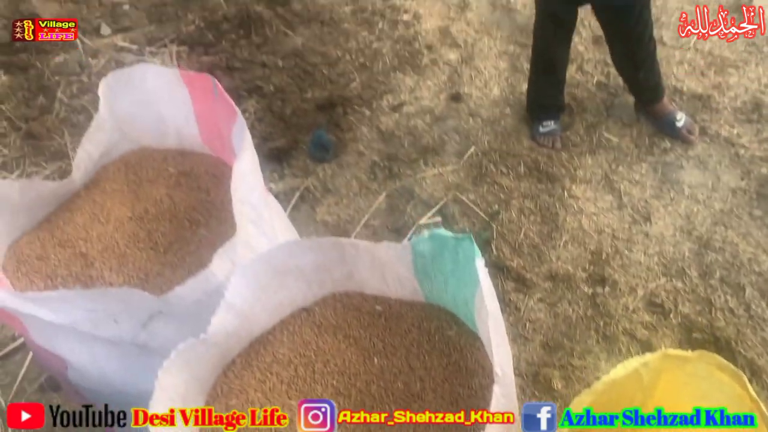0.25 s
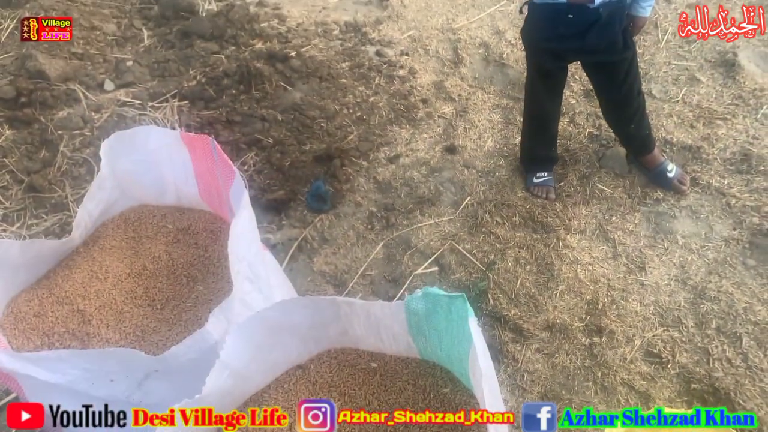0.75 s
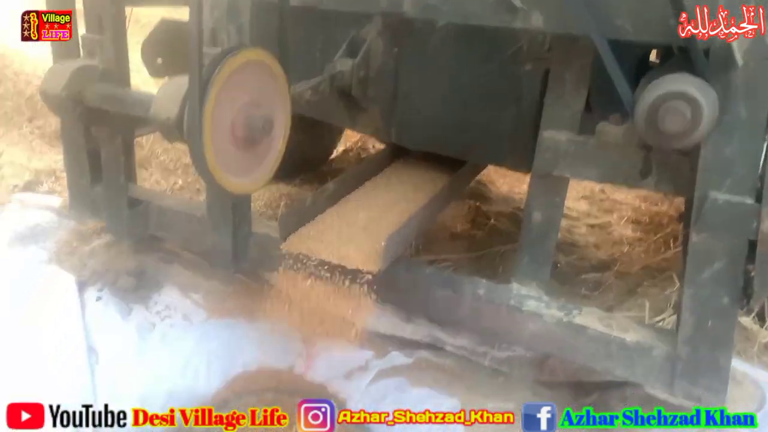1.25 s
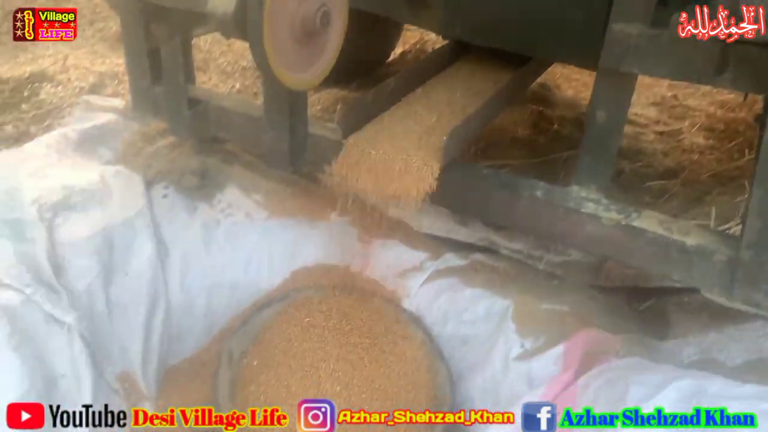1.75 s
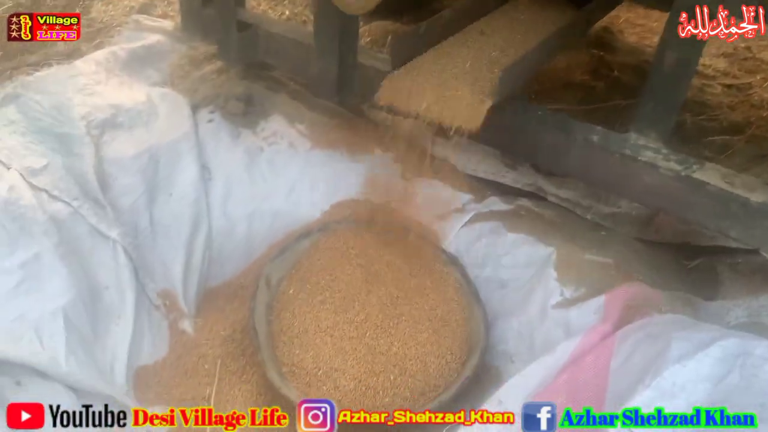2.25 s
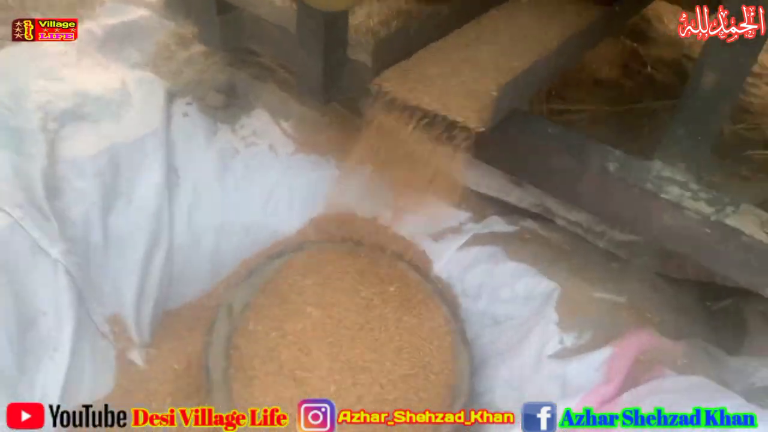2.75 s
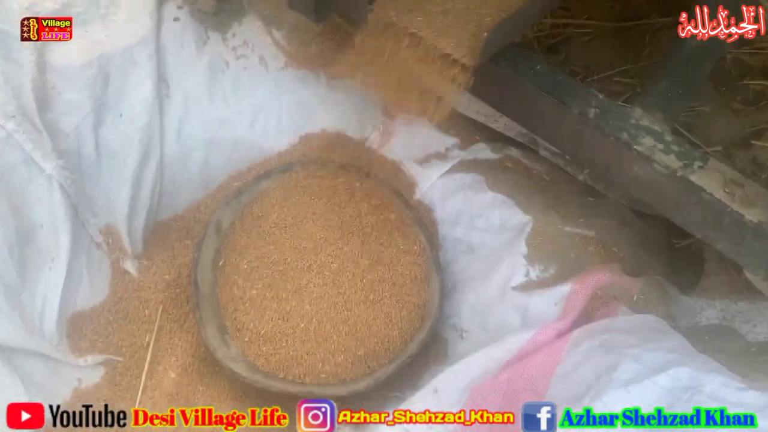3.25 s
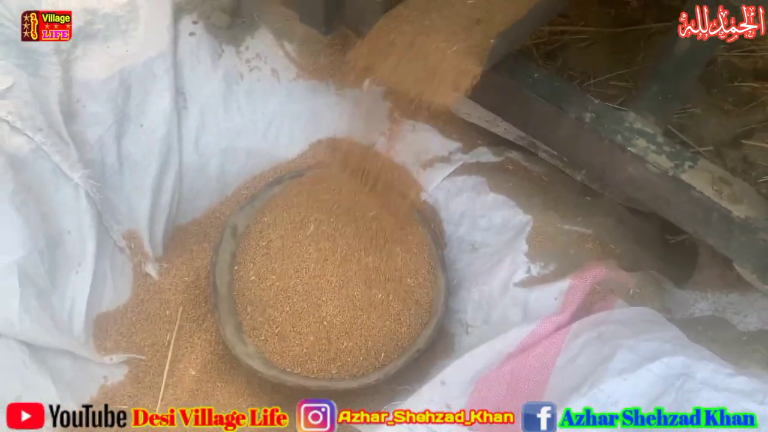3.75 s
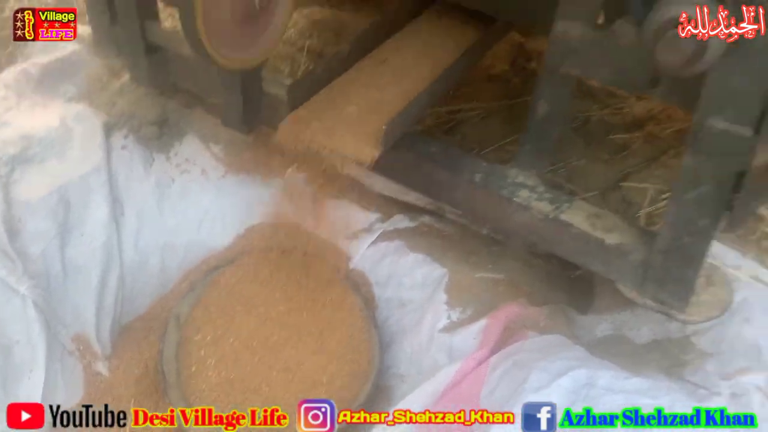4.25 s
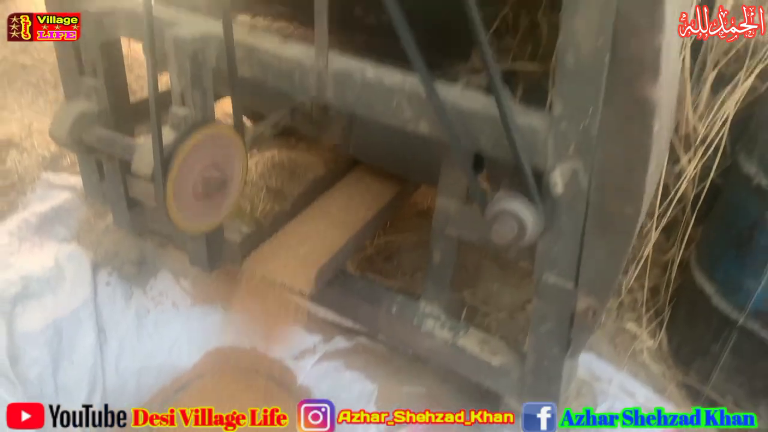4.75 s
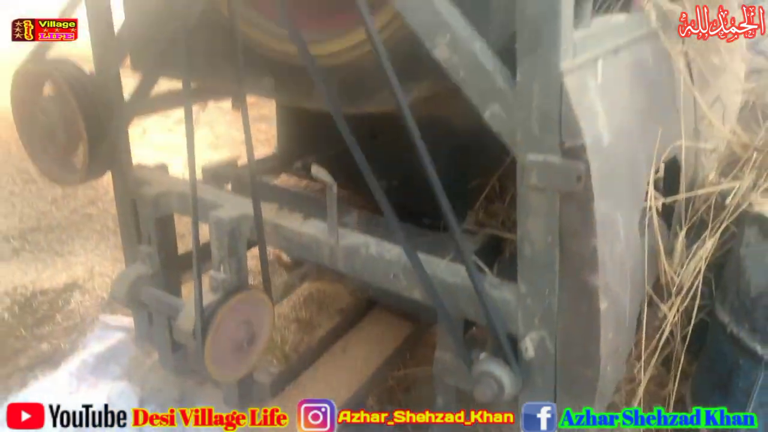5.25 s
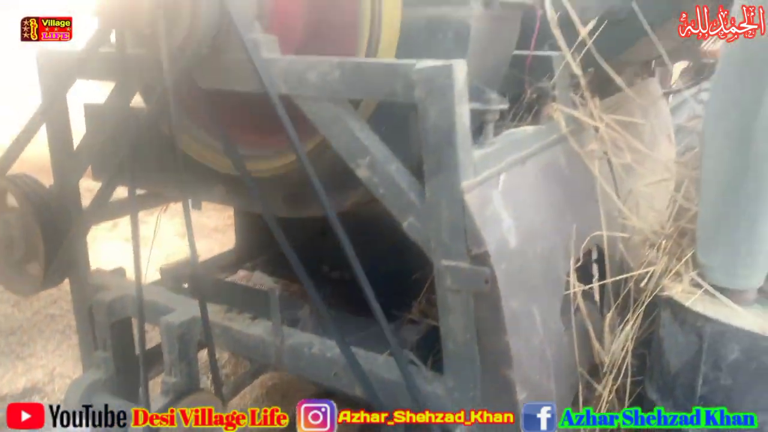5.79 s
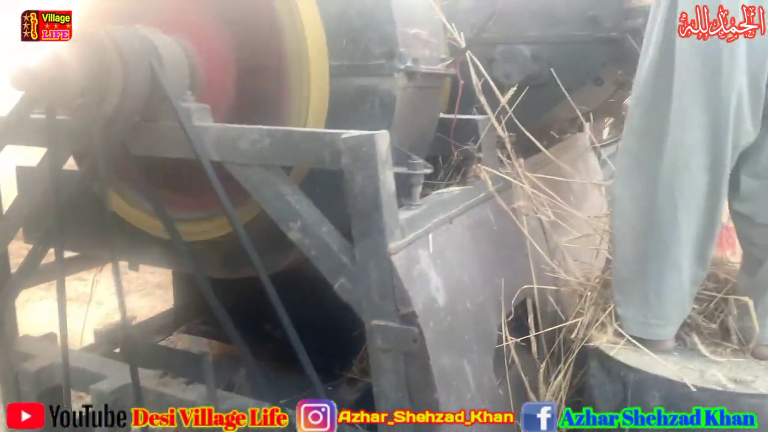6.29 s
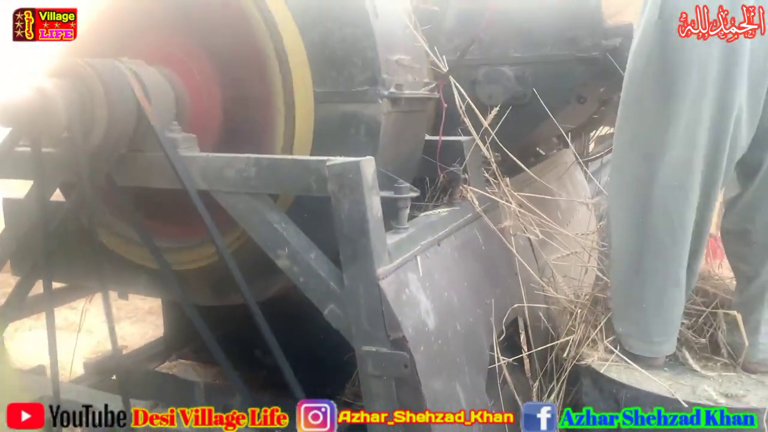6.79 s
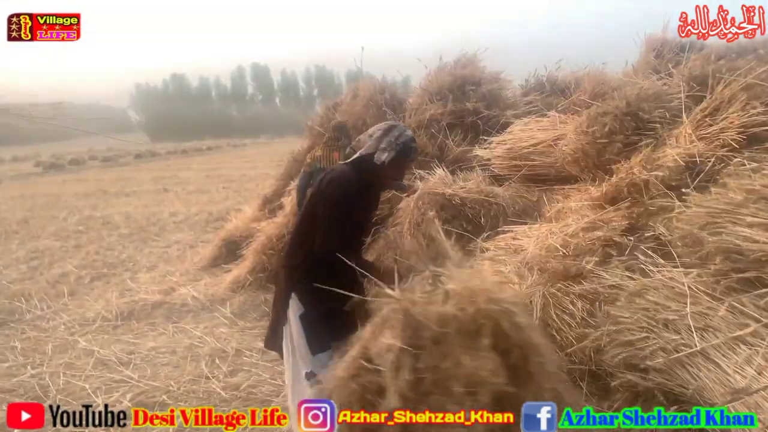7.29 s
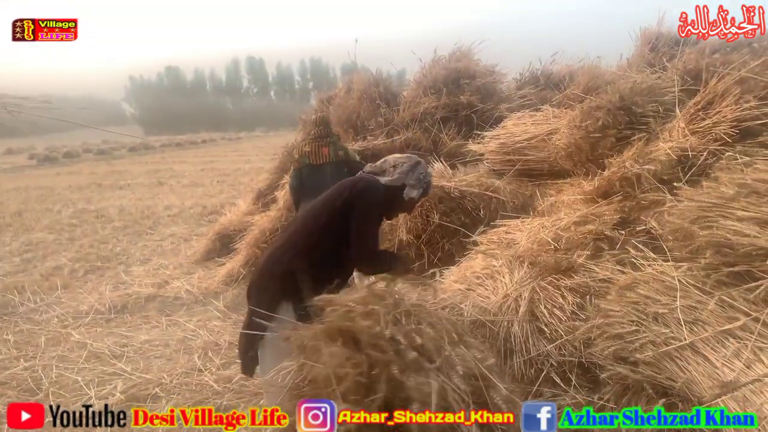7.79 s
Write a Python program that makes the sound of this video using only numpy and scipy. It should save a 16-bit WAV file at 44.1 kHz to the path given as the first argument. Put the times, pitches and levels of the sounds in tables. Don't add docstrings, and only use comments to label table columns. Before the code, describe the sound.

Continuous farm machinery outdoors, heard through a hand-held stereo pair with limited peaks. A low tractor drone sits under fan and drum roar, first with a faint grain hiss, then abruptly closer at the chute with dense grain rattling on sheet metal and rapid knocking. The engine tone sags as the listener moves to the spinning drum, knocks come and go, and finally a cut to the straw stack leaves everything somewhat quieter.

```python
import sys
import numpy as np
from scipy import signal
from scipy.fft import rfft, irfft, next_fast_len
from scipy.io import wavfile
from scipy.ndimage import uniform_filter1d

SR = 44100
rng = np.random.default_rng(int(sys.argv[2]) if len(sys.argv) > 2 else 0)


def int16_out(signal):
    q = np.round(np.clip(np.atleast_2d(signal).T, -1, 1) * 32767)
    wavfile.write(sys.argv[1], SR, q.astype(np.int16))


def field_ratio(decibels):
    return 10 ** (np.asarray(decibels, dtype=float) / 20)


N = 354123
SIZE = next_fast_len(N)
HZ = np.maximum(np.arange(SIZE // 2 + 1) * SR / SIZE, 1)
T = np.arange(N) / SR

JUMPS = [
    1.040,
    7.1035,
]
# time_s, share_of_the_way
WALK = [
    (4.0, 0.038),
    (4.8, 0.18),
    (5.6, 1),
    (6.2, 0.96),
]
FADE_IN_S, FADE_FROM = 0.026, 0.043

# time_s, firing_rate_hz, level_db (rms of the first order)
ENGINE = [
    [(0, 43.75, -19.5), (0.4, 43.57, -20), (1.03, 42.91, -20)],
    [(1.07, 45.7, -16.5), (1.5, 45.75, -17), (2.28, 46.12, -16), (2.75, 46.45, -16), (3.5, 46.64, -15),
     (3.88, 46.63, -16), (4.29, 46.01, -16), (4.69, 45.48, -19), (5.49, 44.5, -21.7), (5.89, 43.69, -22),
     (6.3, 43.45, -22.3), (7.1, 43.43, -23)],
    [(7.13, 43.23, -24.5), (7.73, 43.57, -24), (8.03, 43.67, -24)],
]
SECOND_DB = [4.6, 1.6, 2.8, 1.8]
# multiple, level_db (rms)
UPPER = [
    [(3, -26), (4, -30), (9, -32.5), (11, -35)],
    [(3, -22), (4, -28), (8, -30), (9, -29), (11, -36)],
    [(3, -23.5), (4, -37), (8, -38), (9, -35), (18.5, -38)],
    [(3, -28), (4, -34), (9, -37), (11, -33)],
]
# multiple, level_db (rms)
WHINE = [
    [(5, -41), (6, -28), (7, -33.5)],
    [(5, -32), (6, -43), (7, -30)],
    [(5, -28), (6, -21.5), (7, -31)],
    [(5, -38.5), (6, -27), (7, -37)],
]
# multiple, loudest_s, half_width_s, level_db (rms)
PASSING = [
    (7, 4.95, 0.75, -26),
    (5, 4.9, 1.0, -29),
    (6, 5.1, 0.35, -29),
    (6, 3.8, 0.6, -36),
    (4, 3.2, 0.8, -31.5),
]
# multiple of the firing rate, level_db (over order 1)
SHAFTS = [(1.34, -10.5), (1.59, -10.5), (1.73, -10)]
ENGINE_DB = 1.5

# time_s, level_db (over the mean)
FEED = [
    [(0.2, -1.4), (0.37, 0.5), (0.5, -1.8), (1.035, 0)],
    [(1.07, 0.6), (1.3, -0.1), (1.74, -1), (1.8, 0.5), (2.35, -0.3), (3.03, 2.4), (4.21, 0.9), (4.29, 1.5),
     (5.96, 0.3), (7.1, 0.1)],
    [(7.13, 0), (8.03, -0.4)],
]
# pitch_hz, level_db (per Hz)
ROAR = [
    [(26, -33), (45, -5), (93, -6), (198, -16.5), (254, -15), (380, -8.5), (515, -19.5), (619, -11),
     (745, -18.5), (867, -18), (1100, -22.5), (2500, -40), (3250, -67), (5500, -120)],
    [(26, -40), (45, -15), (103, -8), (139, -6.5), (276, -11.5), (327, -18), (414, -10), (560, -10.5),
     (797, -14), (959, -15.5), (1280, -15.5), (2500, -27), (3250, -58), (5500, -120)],
    [(26, -34), (45, -4), (91, -7), (179, -10), (258, -7.5), (473, -17.5), (721, -14.5), (811, -14),
     (992, -18.5), (1940, -28), (2220, -24), (2500, -41), (3250, -64), (5500, -120)],
    [(26, -32), (45, -11), (70, -15), (96, -6.5), (173, -10), (267, -8), (322, -7.5), (466, -8),
     (579, -13.5), (943, -10.5), (1170, -18.5), (2500, -36.5), (3250, -59), (5500, -120)],
]
# pitch_hz, level_db (per Hz)
RATTLE = [
    [(1200, -43), (2000, -1), (2700, -0.5), (3600, -1), (5300, -2), (7800, -7), (10000, -13), (12000, -10),
     (15000, -19)],
    [(1200, -8), (2000, -1), (3900, -4.5), (5300, -8.5), (7500, -8), (9000, -10), (10800, -9.5),
     (12500, -10), (15000, -20)],
    [(1200, -12), (2000, -8.5), (3000, -4), (4400, -5), (5600, -9), (7200, -11.5), (9000, -13),
     (10600, -12.5), (12500, -12.5), (15000, -24)],
    [(1200, -2.5), (2000, -4), (2750, -1.5), (3330, -7.5), (4470, -10), (5240, -15), (5900, -11.5),
     (6900, -19), (9500, -16), (12500, -17), (15000, -25)],
]
ROAR_DB = [-21, -22.5, -23, -24.5]
RATTLE_DB = [-37, -29.5, -30.5, -32.5]
RATTLE_FOLLOWS = 1

# start_s, peak_db, ring_hz, hiss_db (jolted grain over the usual)
KNOCKS = [(0.128, -25, 3280, -1), (0.3237, -23, 4200, -3), (0.7644, -28, 3950, 0), (0.89, -28, 3287, -2),
          (1.291, -22, 3770, 3), (1.368, -24, 4080, 0), (1.6283, -14, 3780, -2), (1.811, -13, 3600, 0),
          (1.9945, -16.5, 3300, 5), (2.1738, -10.5, 3460, 3), (2.3654, -17, 3940, 2), (2.7, -22, 3884, 1),
          (3.099, -22, 3084, 2), (3.2797, -11, 3460, 2), (3.462, -10.5, 3200, -0.5),
          (3.6385, -14.5, 2960, 3), (3.824, -12.5, 4220, 1), (4.005, -17, 4220, 2), (4.7468, -16, 4120, 1),
          (4.9342, -10.5, 3700, 2.5), (5.1183, -10.5, 3600, -2.5), (5.3054, -11.5, 3620, -1),
          (5.8995, -23, 3980, 3), (6.1844, -22.5, 3430, 0), (6.2794, -20, 3110, -2),
          (6.4739, -15, 3240, -2), (6.6592, -17, 3915, -2), (6.86, -14, 3200, -0.5), (7.195, -22, 4060, -3),
          (7.395, -24, 4020, -1)]
# pitch_hz, level_db (per Hz)
KNOCK = [(900, -29), (1500, -13), (2900, -33), (4100, -6.5), (7000, -6.5), (10000, -6), (12500, -3.5),
         (15000, -29)]
# pitch_hz, width_hz, level_db
PLATE = [(1780, 76, -7.5), (2360, 110, -7.5), (2600, 190, -12.5), (3150, 170, -8.5), (4060, 220, -20),
         (4980, 280, -11), (7600, 530, -13)]
RING_DB = [-15, -11.5, -9, -13.5]
KNOCK_MS, RING_WIDTH_HZ = 18, 60

# pitch_hz,
# width_hz, lift_db
CASING = [
    [(855, 91, 8.5), (623, 40, 2), (8170, 320, 3)],
    [(817, 41, 5), (1400, 490, 1.5), (340, 69, 8.5), (8310, 430, 7.5)],
    [(809, 15, 10), (936, 64, 3), (629, 40, 5), (1610, 220, 4.5), (8120, 290, 6.5)],
    [(465, 60, -1), (820, 55, 1), (990, 80, 1.5), (7950, 380, 8.5)],
]
# pitch_hz, likeness_0_to_1
LIKENESS = [
    [(80, .95), (180, .4), (350, .45), (1000, .8), (2000, .6), (5000, .45), (8300, .2)],
    [(100, .99), (350, .8), (700, .52), (1900, .4), (3000, .1), (8300, .2)],
    [(100, .99), (350, .94), (1000, .68), (1500, .15), (3000, .4), (8300, .2)],
    [(100, .99), (350, .93), (1000, .84), (3000, .7), (5000, .6), (8300, .35)],
]
# pitch_hz, level_db
LEAN = [
    [(60, 14), (180, -1.5), (540, 2), (1620, -1.5), (4850, 1), (14600, -8)],
    [(60, 24), (150, -5), (370, -2), (930, 2.5), (2330, 1.5), (5830, -1.5), (14600, -18)],
    [(60, -4.5), (180, -17), (540, 3.5), (1620, -2), (4850, 0), (14600, -5)],
]
LEFT_LAG_MS = [.38, .2, -.1, -.46]
TOP_HZ, TOP_LAG_MS = 9300, .2965

# low_hz, high_hz
MID_GAPS = [(0, 15), (11600, 12300), (14600, 22050)]
# low_hz, high_hz
SIDE_GAPS = [(0, 15), (10000, 10200), (13200, 13700), (15500, 22050)]
LOW_CUT_HZ, CEILING = 38, .8


def rms_one(x):
    return x / np.sqrt(np.mean(x ** 2) + 1e-20)


def at_hz(points):
    hz, value = np.transpose(points)
    return np.interp(np.log(HZ), np.log(hz), value)


def in_time(tables):
    s, *columns = np.concatenate(tables).T
    return [np.interp(T, s, column) for column in columns]


def drift(rate):
    r = np.exp(-80 * np.pi * rate / SR)
    noise = rng.standard_normal(N // 40 + 2002)
    slow = signal.lfilter([1], [1, -2 * r, r * r], noise)[2000:]
    return np.interp(np.arange(N) / 40, np.arange(len(slow)), rms_one(slow))


def places():
    stand = np.searchsorted(JUMPS, T)
    way = np.interp(T, *np.transpose(WALK))
    return np.array([stand == 0, (stand == 1) * (1 - way), (stand == 1) * way, stand == 2])


def heard(pair, spectra, where):
    mid, side = rfft(pair, SIZE)
    out = 0
    for k, share in enumerate(where):
        alike = np.where(HZ > TOP_HZ, 1, at_hz(LIKENESS[k]))
        shared, own = np.sqrt(1 + alike) * mid, np.sqrt(1 - alike) * side
        left, right = shared + own, shared - own
        lift_db = sum(db / (1 + (2 * (HZ - hz) / width) ** 2) for hz, width, db in CASING[k])
        colour = field_ratio(at_hz(spectra[k]) + lift_db)
        lean_db = np.clip(at_hz(LEAN[(k + 1) // 2]), -3, 3) * (HZ < TOP_HZ)
        lean = field_ratio(lean_db / 2)
        lag_s = np.where(HZ > TOP_HZ, TOP_LAG_MS, LEFT_LAG_MS[k]) / 1000
        late = np.exp(-2j * np.pi * HZ * lag_s)
        stereo = irfft([left * colour * lean * late, right * colour / lean], SIZE)[:, :N]
        out = out + share * rms_one(stereo)
    return out


def engine(where):
    rate_hz, level_db = in_time(ENGINE)
    turn = 2 * np.pi * np.cumsum(rate_hz) / SR
    left_lag_s = np.dot(LEFT_LAG_MS, where) / 1000
    turn = np.array([turn - 2 * np.pi * rate_hz * left_lag_s, turn])

    first_db = level_db + ENGINE_DB
    level = {1: field_ratio(first_db), 2: field_ratio(first_db + np.dot(SECOND_DB, where))}
    for share, orders, whine in zip(where, UPPER, WHINE):
        for k, db in orders + [(k, db + ENGINE_DB) for k, db in whine]:
            level[k] = level.get(k, 0) + share * field_ratio(db)
    for k, s, width, db in PASSING:
        level[k] = level[k] + field_ratio(db + ENGINE_DB) * np.exp(-((T - s) / width) ** 2)

    out = 0
    for k in sorted(level):
        smear = 4.5 * (k - 1) - 1.68 * (k - 1) ** 2
        waver = field_ratio(min(k, 2) * .7 * drift(5))
        out = out + level[k] * waver * np.cos(k * turn + smear)
    for k, db in SHAFTS:
        waver = field_ratio(db + 2.5 * drift(3))
        out = out + level[1] * waver * np.sin(k * turn + drift(1.5))
    lean_db = np.dot([-1.2, -3., -3., -2.8], where)
    return np.sqrt(2) * out * field_ratio(lean_db / 2 * np.array([[1], [-1]]))


def panels(x, patchy_db):
    cells = signal.stft(x, nperseg=512)[2]
    chance = rng.standard_normal(cells.shape[1:])
    chance = uniform_filter1d(chance, size=2, axis=0)
    chance = uniform_filter1d(chance, size=7, axis=1)
    return signal.istft(cells * field_ratio(patchy_db * rms_one(chance)), nperseg=512)[1][:, :N]


def roar(roar_db, where):
    surge = field_ratio(.5 * drift(25) + .2 * drift(4))
    air = rng.standard_normal((2, N)) * surge
    return field_ratio(roar_db + 8) * heard(panels(air, patchy_db=1.04), ROAR, where)


def grains(per_s, spread_db):
    force = field_ratio(spread_db * np.minimum(rng.exponential(1, (2, N)), 5))
    direction = rng.choice([-1, 1], (2, N))
    return force * direction * (rng.random((2, N)) < per_s / SR)


def rattle(rattle_db, where):
    clumps = field_ratio(.9 * drift(35) + .5 * drift(7))
    rain = grains(14000, spread_db=2.2) * clumps
    return field_ratio(rattle_db + 5.5) * heard(panels(rain, patchy_db=2.0), RATTLE, where)


def sieve(where):
    jolt, ring = np.zeros(N), np.zeros(N)
    shake_db = 1.5
    rings_db = np.dot(RING_DB, where)
    age = np.arange(round(.06 * SR)) / SR / (KNOCK_MS / 1000)
    shape = np.clip(age / .35, 0, 1) / (1 + (age / 1.15) ** 6)
    for s, db, hz, hiss_db in KNOCKS:
        swell = field_ratio(db - 8.5) * shape
        start = round((s - .004) * SR)
        at = slice(start, start + len(age))
        jolt[at] += field_ratio(hiss_db) * swell
        strong_ring = (hz, RING_WIDTH_HZ, rings_db[start] + 6.0)
        for mode_hz, width, mode_db in PLATE + [strong_ring]:
            band = signal.butter(1, [mode_hz - width, mode_hz + width], "band", fs=SR)
            level = field_ratio(mode_db + shake_db * rng.standard_normal())
            tone = rms_one(signal.lfilter(*band, rng.standard_normal(len(age))))
            ring[at] += level * swell * tone
    hiss = heard(grains(5000, spread_db=3), [KNOCK] * 4, where)
    return jolt * hiss + ring * field_ratio(np.array([[-.7], [.7]]))


def scene():
    feed_db, = in_time(FEED)
    where = places()
    roar_db = np.dot(ROAR_DB, where) + feed_db
    rattle_db = np.dot(RATTLE_DB, where) + RATTLE_FOLLOWS * feed_db
    field = engine(where) + roar(roar_db, where) + rattle(rattle_db, where) + sieve(where)
    for s in JUMPS:
        fade = np.clip(FADE_FROM + (T - s) / FADE_IN_S, 0, 1)
        field = field * np.where(T > s, fade, 1)
    return field


def without(x, gaps):
    keep = np.prod([(HZ < low) | (HZ > high) for low, high in gaps], axis=0)
    return irfft(rfft(x, SIZE) * keep, SIZE)[:N]


def top_cut(x):
    return signal.sosfilt(signal.butter(12, 15150, fs=SR, output="sos"), x)


def record(dry):
    low_cut = signal.cheby2(8, 20, LOW_CUT_HZ, "high", fs=SR, output="sos")
    x = signal.sosfiltfilt(low_cut, dry)
    over_db = np.maximum(20 * np.log10(np.abs(x).max(axis=0) / CEILING + 1e-9) + 0.091, 0)
    fall = 150 * T
    held_db = np.maximum.accumulate(over_db + fall) - fall
    held_db = uniform_filter1d(held_db, size=64, origin=-31)
    x = x * field_ratio(-.8 * held_db)
    left, right = x / (1 + (np.abs(x) / CEILING) ** 6) ** (1 / 6)
    mid = without((left + right) / 2, MID_GAPS)
    side = without((left - right) / 2, SIDE_GAPS)
    return top_cut(np.array([mid + side, mid - side]))


dry = scene()
out = record(dry)
int16_out(out)
```